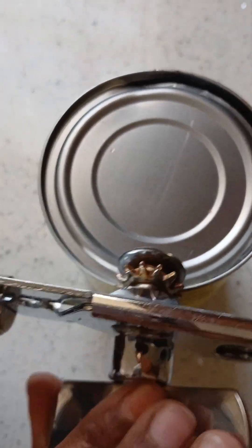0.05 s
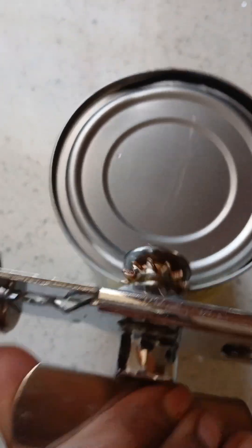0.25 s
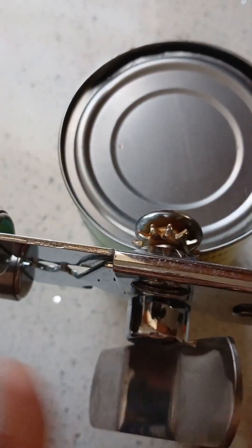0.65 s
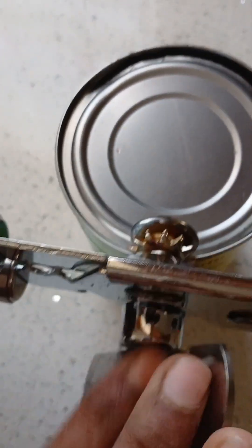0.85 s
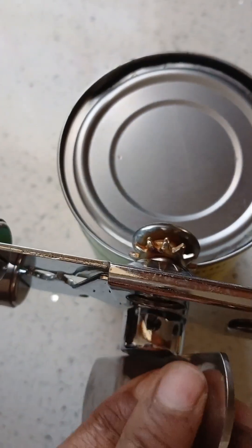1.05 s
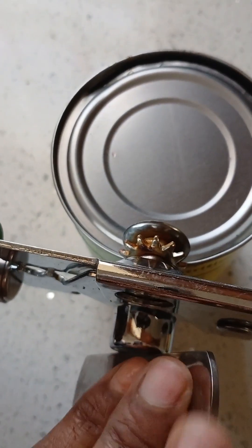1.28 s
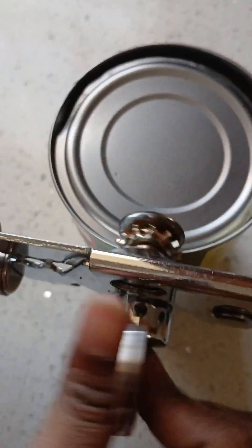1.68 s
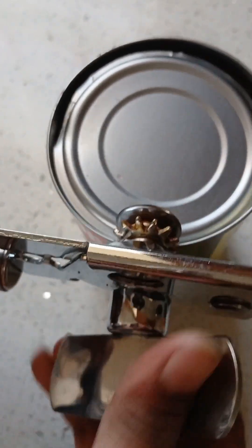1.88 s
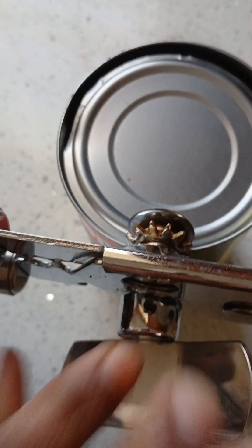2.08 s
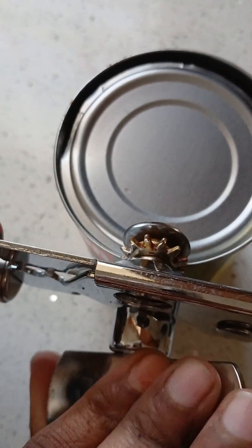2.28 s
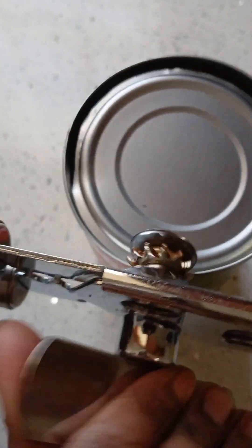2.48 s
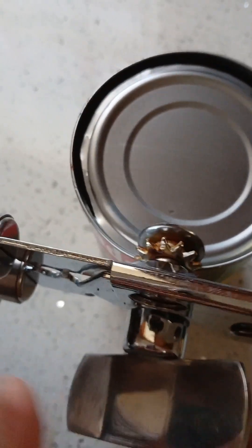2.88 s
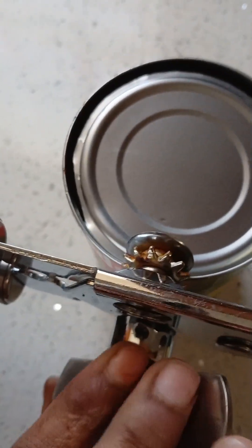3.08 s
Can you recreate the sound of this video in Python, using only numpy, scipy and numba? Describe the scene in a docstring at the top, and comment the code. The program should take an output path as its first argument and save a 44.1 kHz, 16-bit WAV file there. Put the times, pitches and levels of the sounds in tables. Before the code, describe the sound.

Can opener crunching and scraping around a tin in three bursts, with metal knocks between.

```python
"""A kitchen counter, stereo microphones close to a full tin; an appliance hums in the room throughout.
A hand-turned can opener knocks, then bites at 0.2 s: the wheel sticks and slips through the lid, ringing
the tin, while the can groans and the metal parts in sharp snaps. The loose key knocks as the hand takes
a new grip, and skin rubs near the right microphone. A second twist follows at 1.4 s and, after another
regrip, a third at 2.4 s; a few last knocks and rubs leave the hum."""
import sys
import numpy as np
from scipy import signal
from scipy.fft import rfft, irfft, next_fast_len
from scipy.io import wavfile
from scipy.ndimage import uniform_filter1d
from numba import njit

SR = 44100
rng = np.random.default_rng(int(sys.argv[2]) if len(sys.argv) > 2 else 0)


def persist_wave(psi):
    """Save psi, clipped to +-1, as 16-bit WAV."""
    counts = np.round(np.clip(psi, -1, 1) * 32767).astype(np.int16)
    wavfile.write(sys.argv[1], SR, np.atleast_2d(counts).T)


N = 143325
TIME = np.arange(N) / SR

# modes of the lid and wall: f/Hz, level/dB, t60/s
TIN_MODES = [(536,-1.5,0.15),(678,-4.5,0.13),(915,-8.5,0.08),(1084,-3,0.11),(1394,-3.5,0.09),(1507,-6.5,0.086),(1639,-0.5,0.056),(1768,-3,0.057),(1916,-1,0.031),(2196,-1.5,0.1),(2900,-8.5,0.035),(4300,-18,.04)]
# modes of the full can in the hand: f/Hz, level/dB, t60/s
CAN_MODES = [(54,-13.5,0.16),(115,-5.5,0.079),(146.5,-6,0.15),(238.2,0.5,0.15),(261.8,3.5,0.091),(304.2,1,0.074),(445,-15.5,0.12)]


def twist_control(column, rest):
    """One property of the three twists of the key over time, at rest in between."""
    # per twist: t/s, ring level/dB, ring f/Hz, rasp level/dB, grit level/dB, groan level/dB
    twists = [
        [(0.18,-45,1430,-61,-62,-60), (0.21,-28.5,1430,-30,-40,-34), (0.234,-15,1350,-29,-31.5,-25),
         (0.262,-24.5,1340,-13.5,-25,-29), (0.278,-15,1320,-19,-31.5,-21), (0.302,-15.5,1270,-19.5,-25,-16),
         (0.316,-18,1390,-21,-27,-10), (0.344,-16,1850,-25.5,-27.5,-12.5), (0.402,-15.5,1713,-22.5,-27.5,-16.5),
         (0.416,-33,1850,-25.5,-41,-19), (0.444,-21.5,1870,-26.5,-28,-25.5), (0.5,-42,1530,-36,-45,-25),
         (0.54,-67,1400,-58,-73,-34)],
        [(1.44,-47.5,1610,-63,-81,-32), (1.488,-36,1460,-46,-45,-33), (1.51,-21.5,1436,-31,-41.5,-23),
         (1.595,-21.5,1524,-24,-33.5,-16), (1.662,-27,1270,-39,-27,-21.5), (1.678,-21,1240,-31,-23.5,-9),
         (1.714,-20.5,1435,-34,-32,-24.5), (1.736,-34,1610,-45,-26.5,-12), (1.752,-18.5,1747,-51,-22,-20.5),
         (1.782,-18,1884,-34,-27,-14), (1.88,-61,1660,-52,-58,-34.5)],
        [(2.39,-49.5,2020,-70,-73,-33), (2.436,-32,1520,-46,-37.5,-28.5), (2.498,-20.5,1590,-23,-32,-19),
         (2.51,-30,2000,-42,-30.5,-10.5), (2.528,-19,2080,-43,-27,-17.5), (2.55,-39,2260,-27,-29,-15),
         (2.595,-24,2240,-35,-30.5,-15), (2.614,-42,2210,-40,-28,-15.5), (2.648,-34,2080,-37,-26,-11.5),
         (2.686,-40,2090,-50,-36.5,-22.5), (2.77,-62,2140,-56,-60,-30.5)],
    ]
    out = np.full(N, float(rest))
    for rows in map(np.array, twists):
        during = (TIME >= rows[0, 0]) & (TIME <= rows[-1, 0])
        out[during] = np.interp(TIME[during], rows[:, 0], rows[:, column])
    return out


def grinding():
    """The wheel sticks and slips through the lid, ringing steel and tin; cutter and feed make grit."""
    # spectrum of the low rasp: f/Hz, level/dB
    rasp_spectrum = [(200,-22),(420,5),(650,-7),(820,3),(1080,-5),(1500,-6),(3000,-30),(16000,-101)]
    judder = from_db(2.5 * drift(per_s=86))
    slips = grains(per_s=1500, spread_db=3)
    ring_hz = twist_control(column=2, rest=1750)
    tin = ring(slips, TIN_MODES)
    tin = moving_resonance(tin, ring_hz, width_hz=206) + 0.14 * tin
    metal = evened(steel(slips, ring_hz, width_hz=37)) + from_db(4) * evened(tin)
    metal = evened(metal, size=700) * from_db(twist_control(column=1, rest=-86) + 0.5)
    rasp = evened(colour(slips, rasp_spectrum), size=700)
    rasp *= from_db(twist_control(column=3, rest=-71) - 1.5)
    return judder * (metal + rasp), judder * grit(), judder * grit()


def steel(slips, hz, width_hz):
    """Slips ring the steel at a few resonances that glide together."""
    # resonances of the scraping steel: multiple of the lowest, level/dB
    partials = [(1,14.5),(1.53,-4),(2.25,-26)]
    return sum(from_db(db) * moving_resonance(slips, ratio * hz, width_hz) for ratio, db in partials)


def grit():
    """Tiny crackles of steel crushing the rim."""
    # spectrum of the crackle: f/Hz, level/dB
    spectrum = [(800,7),(2000,3),(3200,2.5),(5000,1.5),(6200,-2.5),(7400,5.5),(8800,-14),(12000,-2.5),(16000,-14.5)]
    crackle = evened(colour(grains(per_s=3000, spread_db=5), spectrum))
    return crackle * from_db(twist_control(column=4, rest=-96))


def groan():
    """The toothed feed wheel lurches softly along the rim and shakes the whole can."""
    soften = signal.butter(2, 490, fs=SR, output="sos")
    lurches = signal.sosfilt(soften, grains(per_s=380, spread_db=5) + 1e-18)
    return evened(ring(lurches, CAN_MODES), size=900) * from_db(twist_control(column=5, rest=-89))


def snaps():
    """The lid tears in tiny bright fractures, each a click and a crumble."""
    # fractures of the lid: t/s, level/dB, brightest f/Hz
    fractures = [(0.296,0,5000),(0.303,-2,12000),(0.314,-4,8000),(0.324,2.5,6960),(0.4104,-0.5,14100),
                 (1.5478,1,12600),(1.5695,-8,12000),(1.588,6,7600),(1.6053,5.5,7800),(1.667,1.5,7500),(1.686,-7,12000),(1.7,-2,12000),(1.725,-8,11000),(1.745,-2,7600),(1.757,-16,7500),
                 (2.442,0,15100),(2.5104,0.5,12800),(2.61,-7,7500),(2.638,-6.5,7500),(2.654,-6,10000),(2.665,-0.5,7560),(2.682,-4.5,6760),(2.7059,-4,12000)]
    # spectrum of the tearing metal: f/Hz, level/dB
    spectrum = [(800,-4),(3000,1),(5000,-7),(7500,2),(9000,-7.5),(12000,-5),(16000,-1)]
    out = np.zeros(N)
    for start, db, hz in fractures:
        crack = 0.54 * burst(decay_s=0.00037)
        crack[0] += 0.8  # the click
        add(out, start, from_db(db + 2.5) * (crack + 2.06 * resonance(crack, hz, width_hz=4900)))
    return colour(out, spectrum)


def squeaks():
    """Slips lock on to a gliding resonance: narrow when pressed hard, broad and rough when light."""
    # steel on steel, at the wheel or the loose key: t/s, length/s, first f/Hz, last f/Hz, level/dB
    slides = [(0.203,0.064,1384,1330,-25),(0.239,0.07,1123,1085,-21),(0.345,0.012,1840,1885,-11),(0.385,0.008,1686,1647,-13),(0.391,0.021,2507,2700,-26.5),(0.422,0.014,2765,2860,-25.5),(0.408,0.075,1680,1615,-36.5),(0.631,0.019,1570,1620,-27),(0.684,0.013,1500,1440,-29),
              (0.894,0.13,1590,1470,-51.5),(1.023,0.015,1960,1960,-28),(1.039,0.012,2080,2180,-28.5),(1.019,0.044,4800,4870,-50),(1.133,0.043,1940,1950,-51.5),(1.289,0.026,1840,1670,-51.5),
              (1.558,0.091,1440,1357,-24),(1.568,0.014,2170,2140,-23.5),(1.602,0.021,3980,4090,-30),(1.607,0.06,3110,2940,-33),(1.673,0.043,1337,1415,-19),(2.031,0.036,2124,1814,-35.5),(1.988,0.098,5840,5650,-58),
              (2.484,0.014,2000,2040,-22),(2.523,0.019,2180,2200,-20),(2.582,0.012,2875,2780,-18.5),(2.619,0.046,885,810,-31.5),(2.95,0.011,2900,3240,-35)]
    loosening = 0.25  # dB of resonance width per dB that the contact is lighter
    out = np.zeros(N)
    t = TIME[:SR // 4]
    for start, length, first_hz, last_hz, db in slides:
        hz = np.interp(t, [0, length], [first_hz, last_hz])
        tone = steel(rng.standard_normal(len(t)), hz, width_hz=6.8 * from_db(-loosening * db))
        add(out, start, from_db(db + 2.5) * held(t, length) * evened(tone, size=500))
    return out


def creaks():
    """Under load the wheel slips in an even, slowing rhythm, and the can gives a low falling note."""
    # runs of slips on the rim: t/s, length/s, first rate/Hz, last rate/Hz, level/dB
    runs = [(0.259,0.054,155.9,124.6,-20),(0.315,0.1,134.7,102.1,-20),(0.476,0.054,126,120.7,-25.5),(0.665,0.0481,135.7,126.7,-26.5),(2.082,0.049,119,113.1,-30.5)]
    # the can's answer to a slip: f/Hz, level/dB
    spectrum = [(60,-18.5),(105,0),(145,-6),(250,-0.5),(310,-3),(400,-19),(2000,-48.5)]
    rough_db = 3
    out = np.zeros(N)
    t = TIME[:SR // 4]
    for start, length, first_hz, last_hz, db in runs:
        hz = np.interp(t, [0, length], [first_hz, last_hz])
        slips = np.diff(np.floor(np.cumsum(hz) / SR), prepend=-1)  # one click a cycle
        slips *= from_db(rough_db * rng.standard_normal(len(t)))
        add(out, start, from_db(db) * held(t, length) * slips * SR / hz)
    return colour(out, spectrum)


def knocks():
    """Each knock thumps the can, clanks in the tin and ticks in the steel of the opener."""
    # key and cutter hit the can: t/s, thump level/dB, clank level/dB, clank f/Hz, tick level/dB
    hits = [(0.037,-2,-21.5,760,-34),(0.553,-3.5,-12,580,-10),(0.633,7,2,970,0.5),(0.662,5.5,-9,1500,-28),(0.686,-5.5,-7.5,1320,-34),
            (1.026,-5,-18,1930,-10),(1.045,0.5,-20.5,750,-23),(1.312,-12.5,-29,700,-51),(2.038,-2,-24,1950,-49),(2.055,0.5,-22,1840,-44),
            (2.5854,12.5,2,880,-7),(2.933,-1,-19,770,-17.5),(2.955,2,-23,3020,-20),(3.083,-34,-64,2020,-31.5)]
    # spectrum of the tin's clank: f/Hz, level/dB
    clank_spectrum = [(200,-13),(550,6),(900,8),(1500,5.5),(3200,0),(6000,-11),(16000,-34)]
    # spectrum of the opener's tick: f/Hz, level/dB
    tick_spectrum = [(300,-69),(800,-3),(2500,15),(4500,7),(7000,13),(9000,-1.5),(16000,2)]
    thumps, clanks, ticks = np.zeros((3, N))
    for start, thump_db, clank_db, hz, tick_db in hits:
        add(thumps, start, from_db([thump_db - 21]))
        chatter = 0.71 * burst(decay_s=0.015)
        chatter[0] += 0.7  # first contact
        clank = resonance(chatter, hz, width_hz=243) + 0.5 * chatter
        add(clanks, start, from_db(clank_db + 14) * clank)
        add(ticks, start, from_db(tick_db - 1) * burst(decay_s=0.0033))
    clanks = colour(clanks, clank_spectrum)
    body = ring(thumps, CAN_MODES) + from_db(-37) * ring(clanks, TIN_MODES)
    clatter = clanks + colour(ticks, tick_spectrum)
    return body, clatter


def rubbing():
    """Skin slides near the right microphone in soft swells of fine hiss."""
    # rubs of the hand: middle t/s, half length/s, level/dB
    rubs = [(0.174,0.24,-38.5),(0.516,0.34,-43),(0.983,0.081,-33.5),(1.189,0.061,-35.5),(1.473,0.14,-36.5),(2.01,0.086,-40),(2.198,0.077,-40),(2.438,0.072,-36.5),(2.926,0.097,-40.5),(3.25,0.18,-46)]
    # spectrum of sliding skin: f/Hz, level/dB
    spectrum = [(1000,-1),(4000,-13.5),(5800,-7.5),(7400,1.5),(9000,-13),(11000,-4.5),(13000,-0.5),(15500,5)]
    swells = sum(from_db(db) * np.exp(-((TIME - middle) / half) ** 2) for middle, half, db in rubs)
    hiss = rms_one(colour(rng.standard_normal((2, N)), spectrum))
    grain = from_db(1.5 * drift(per_s=120))
    return hiss * grain * swells * from_db([[-25], [0]])


def room_tone():
    """An appliance hums, wavering, over the low rush of the kitchen, a little to the right."""
    # spectrum of the room's rush: f/Hz, level/dB
    air_spectrum = [(20,-42),(40,-27),(60,-11),(85,-21),(125,-10),(180,-16),(250,-1),(330,-1),(400,-12),(550,-19),(900,-32),(1600,-39),(4000,-46.5),(7500,-43),(10000,-47),(16000,-43.5)]
    # likeness of the rush at the two microphones: f/Hz, correlation/0-1
    likeness = [(100,1),(300,0.84),(700,0),(1500,0.36),(16000,0)]
    # the appliance's hum lines: f/Hz, level/dB
    hum_lines = [(120,-45.5),(245,-37),(295,-48.5),(345,-42),(394,-59)]
    mid, side = rfft(rng.standard_normal((2, N)))
    alike = np.clip(at_hz(likeness, np.arange(len(mid)) * SR / N), -1, 1)
    air = irfft(np.sqrt(1 + alike) * mid + np.sqrt(1 - alike) * side * [[1], [-1]], N)
    out = from_db(-33.5) * rms_one(colour(air, air_spectrum))
    for hz, db in hum_lines:
        level = from_db(db + 5.5 * drift(per_s=1.77))
        out += level * np.sin(2 * np.pi * hz * TIME + 1.2 * drift(per_s=4.9))
    return out * from_db([[-1.2], [1.2]])


def grains(per_s, spread_db):
    """Random clicks of uneven size."""
    sizes = from_db(spread_db * np.minimum(rng.exponential(1, N), 5)) * rng.choice([-1, 1], N)
    return sizes * (rng.random(N) < per_s / SR)


def burst(decay_s, size=900):
    """One contact: a sharp, crumbling crack of unit energy."""
    crack = rng.standard_normal(size) * np.exp(-np.arange(size) / (decay_s * SR))
    return crack / np.sqrt(np.sum(crack ** 2))


def held(t, length, attack_s=0.0027, release_s=0.0086):
    """Envelope of a run of slips: quick attack, hold, release."""
    return np.minimum(t / attack_s, 1) / (1 + np.exp(np.minimum((t - length) / release_s * 2, 50)))


def drift(per_s):
    """A smooth random wander with a spread of 1."""
    step = 40  # samples between points
    r = np.exp(-2 * np.pi * per_s * step / SR)
    slow = signal.lfilter([1], [1, -2 * r, r * r], rng.standard_normal(N // step + 2002))[2000:]
    return np.interp(np.arange(N) / step, np.arange(len(slow)), rms_one(slow))


def ring(x, modes):
    """Every click sets each mode ringing as a dying sine."""
    out = 0
    for k, (hz, db, t60) in enumerate(modes):
        r, w = np.exp(-np.log(1000) / (t60 * SR)), 2 * np.pi * hz / SR
        mode = signal.lfilter([1, 0, -1], [1, -2 * r * np.cos(w), r * r], x + 1e-18) / 2
        out = out + (-1) ** k * from_db(db) * mode
    return out


def resonance(x, hz, width_hz):
    """One resonance with gain 1 at its peak."""
    r, w = np.exp(-np.pi * width_hz / SR), 2 * np.pi * hz / SR
    return signal.lfilter([(1 - r * r) / 2, 0, (r * r - 1) / 2], [1, -2 * r * np.cos(w), r * r], x)


@njit
def moving_resonance(x, hz, width_hz):
    """A resonance whose centre glides."""
    r, w = np.exp(-np.pi * width_hz / SR), 2 * np.pi * hz / SR
    y = np.zeros(len(x))
    for i in range(2, len(x)):
        y[i] = (1 - r * r) / 2 * (x[i] - x[i - 2]) + 2 * r * np.cos(w[i]) * y[i - 1] - r * r * y[i - 2]
    return y


def tail(x, t60):
    """A dense dying ring of unit energy, different at each microphone."""
    t = TIME[:SR // 2]
    response = rng.standard_normal((2, len(t))) * np.exp(-np.log(1000) * t / t60)
    response /= np.sqrt(np.sum(response ** 2, axis=1, keepdims=True))
    return signal.fftconvolve(np.atleast_2d(x), response, axes=1)[:, :N]


def colour(x, spectrum):
    """Causal (minimum-phase) filter with the given spectrum."""
    size = 2 * next_fast_len(N // 2 + SR // 4)
    hz = np.arange(size // 2 + 1) * SR / size
    cepstrum = irfft(np.log(from_db(at_hz(spectrum, hz))))
    cepstrum[1:size // 2] *= 2
    cepstrum[size // 2 + 1:] = 0
    return irfft(rfft(x, size) * np.exp(rfft(cepstrum)))[..., :N]


def evened(x, size=1300):
    """Holds the short-term level at 1 and keeps the grain."""
    return x / np.sqrt(np.abs(uniform_filter1d(x ** 2, size)) + 1e-12)


def at_hz(points, hz):
    point_hz, values = np.array(points).T
    return np.interp(np.log(hz + 1), np.log(point_hz), values)


def from_db(db):
    return 10 ** (np.asarray(db) / 20)


def rms_one(x):
    return x / np.sqrt(np.mean(x ** 2) + 1e-20)


def add(out, start_s, sound):
    start = int(np.clip(start_s * SR, 0, N - 1))
    out[start:start + len(sound)] += sound[:N - start]


def scene():
    """The can stands close by; its cracks scatter off metal and counter, then fade in the kitchen."""
    # the tin's place as the left microphone hears it: f/Hz, level/dB
    left_mic = [(100,-1),(250,0),(400,-5),(700,-1.5),(1300,-1.5),(2400,-1.5),(4400,-7.5),(8000,-6),(15000,-6.5)]
    # the same for the right microphone: f/Hz, level/dB
    right_mic = [(100,0),(250,1.5),(400,4),(700,2),(1300,-2.5),(2400,1.5),(4400,1.5),(8000,-0.5),(15000,2)]
    # spectrum of the kitchen's reverberation: f/Hz, level/dB
    kitchen = [(60,-0.5),(250,-4.5),(600,-9.5),(3000,2.5),(8000,2.5),(16000,2.5)]
    right_lag_s = 0.0002272
    metal, cutter_grit, feed_grit = grinding()
    body, clatter = knocks()
    metal = metal + squeaks()
    sharp = cutter_grit + snaps() + clatter
    near = metal + groan() + creaks() + body + from_db(-3) * sharp
    pair = np.array([near, np.interp(TIME - right_lag_s, TIME, near)])
    pair += from_db(-2) * tail(sharp, t60=0.027) + from_db(-3.5) * tail(feed_grit, t60=0.027)
    pair += from_db(-4.5) * tail(metal, t60=0.072)  # the tin's own echo
    pair += from_db(-8.5) * tail(colour(near, kitchen), t60=0.27)
    return np.array([colour(pair[0], left_mic), colour(pair[1], right_mic)]) + rubbing() + room_tone()


def record(dry):
    """The recorder loses the deepest rumble, rounds the peaks and cuts the top."""
    low_cut = signal.butter(2, 38, "high", fs=SR, output="sos")
    high_cut = signal.ellip(10, 0.2, 80, 16000, fs=SR, output="sos")
    rounded = 1.196 * np.tanh(signal.sosfilt(low_cut, dry) / 1.388)
    return signal.sosfilt(high_cut, rounded)


dry = scene()
out = record(dry)
persist_wave(out)
```